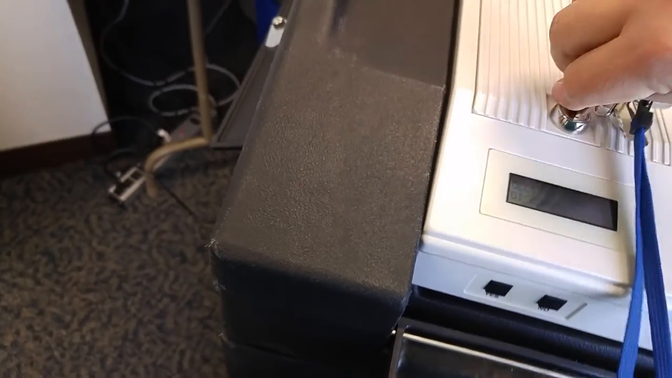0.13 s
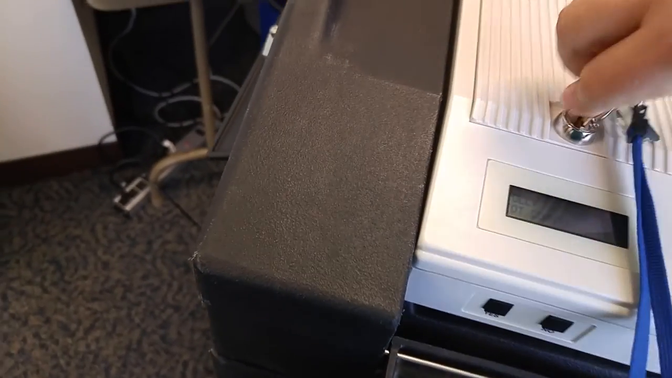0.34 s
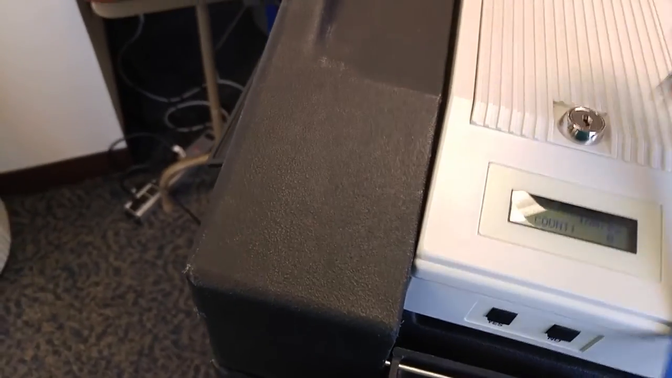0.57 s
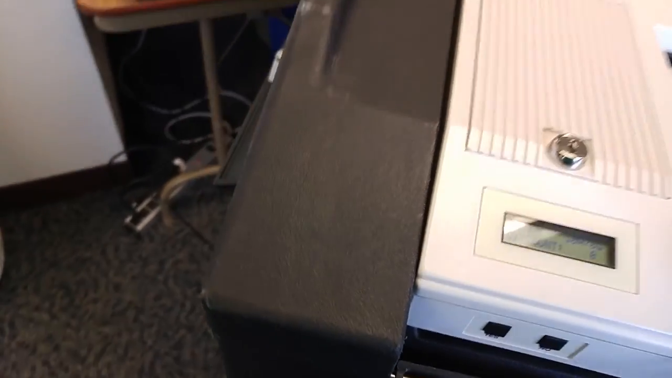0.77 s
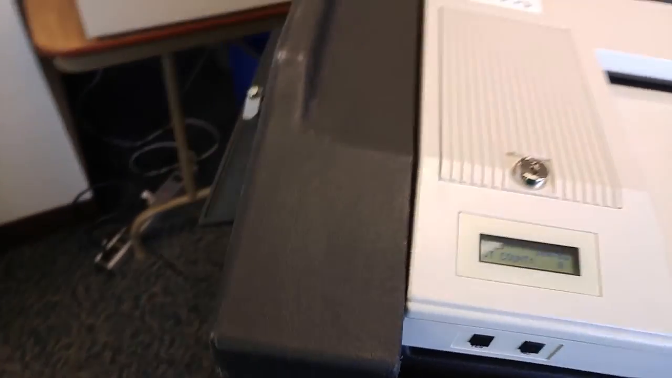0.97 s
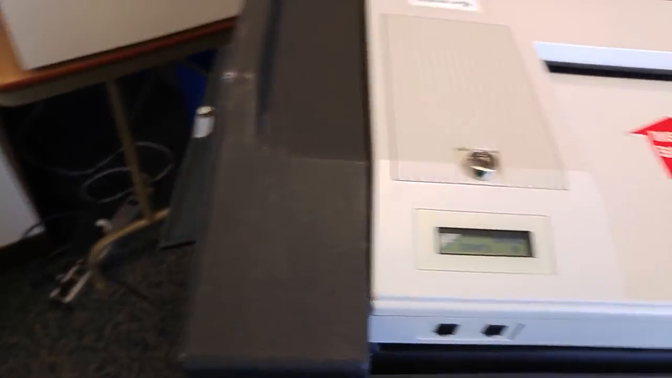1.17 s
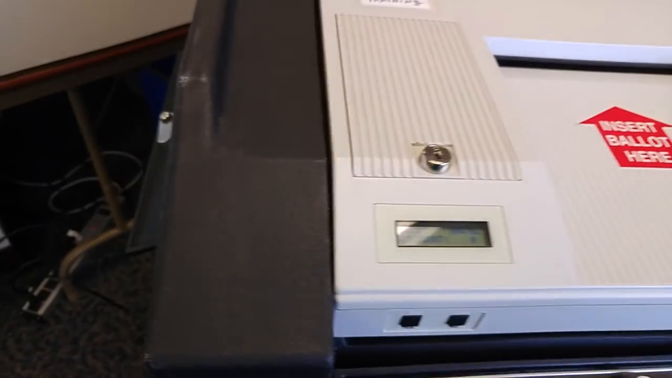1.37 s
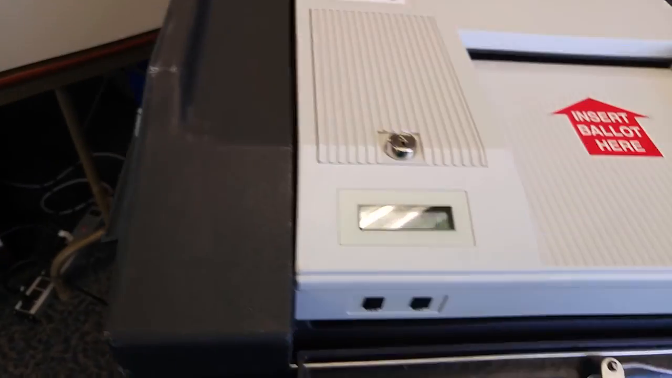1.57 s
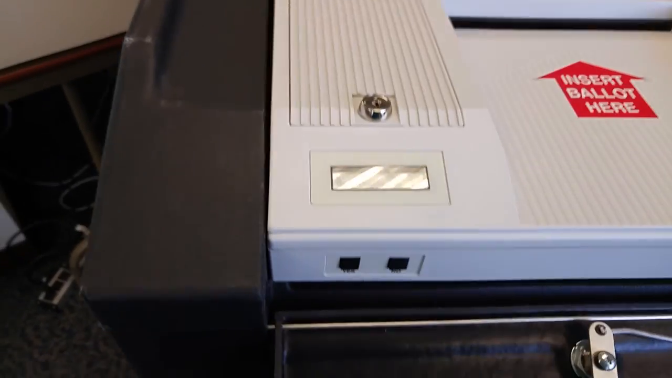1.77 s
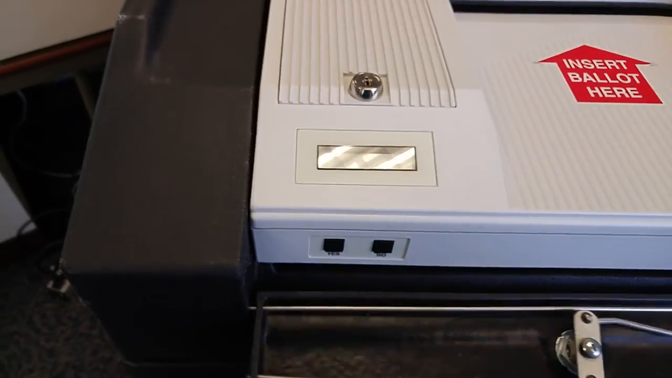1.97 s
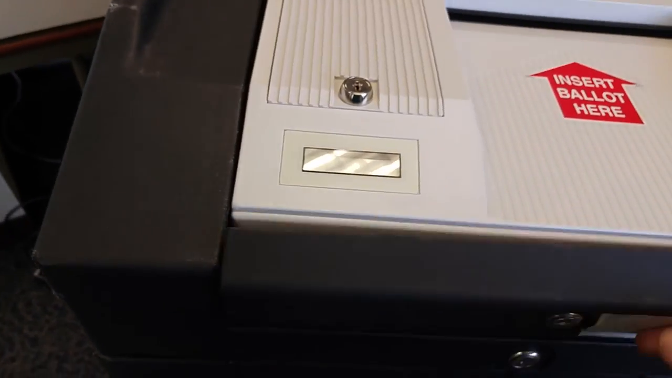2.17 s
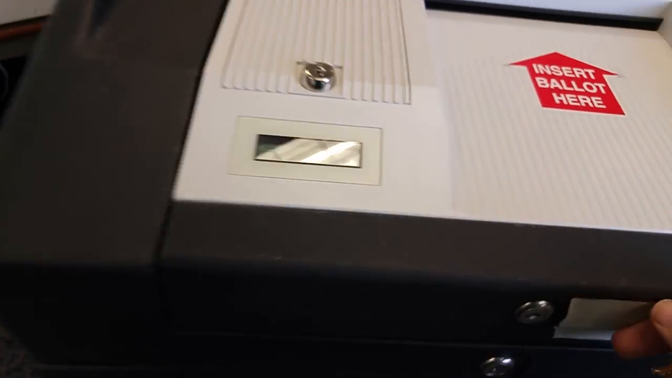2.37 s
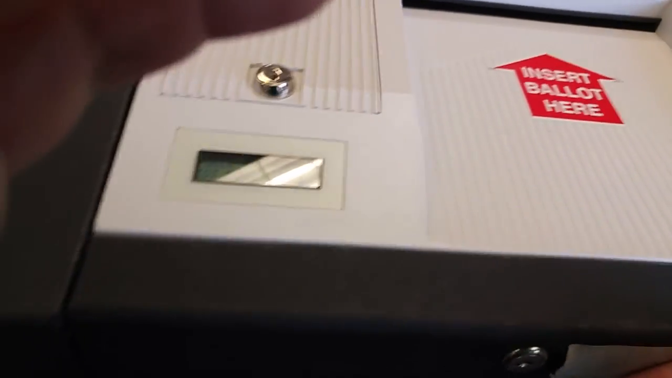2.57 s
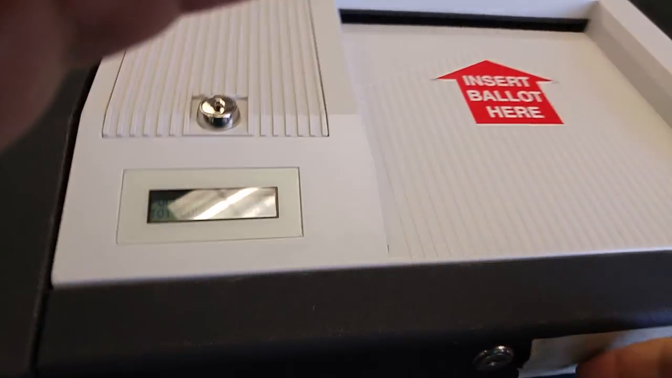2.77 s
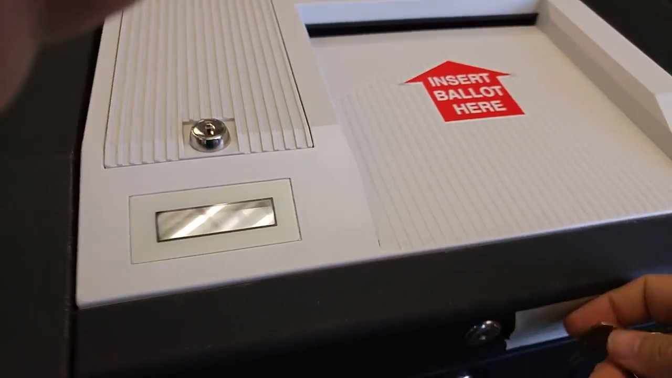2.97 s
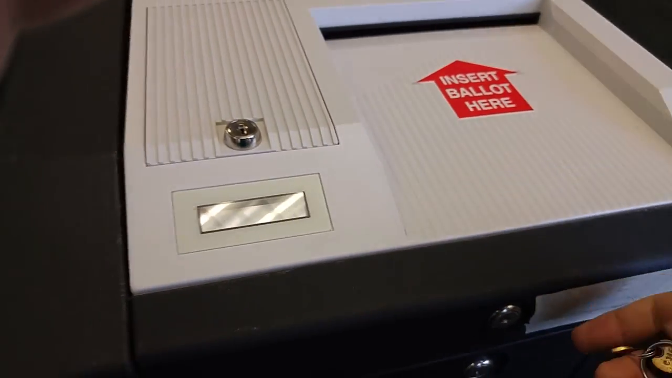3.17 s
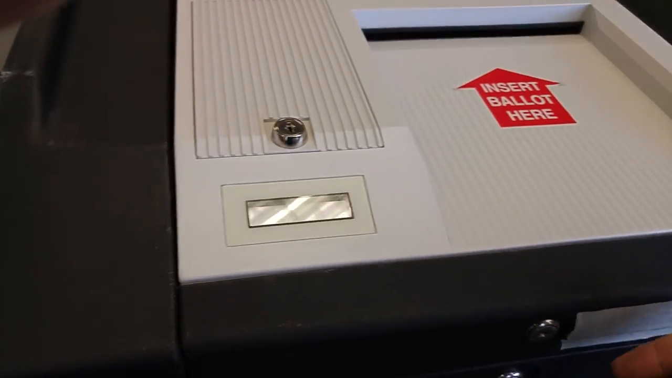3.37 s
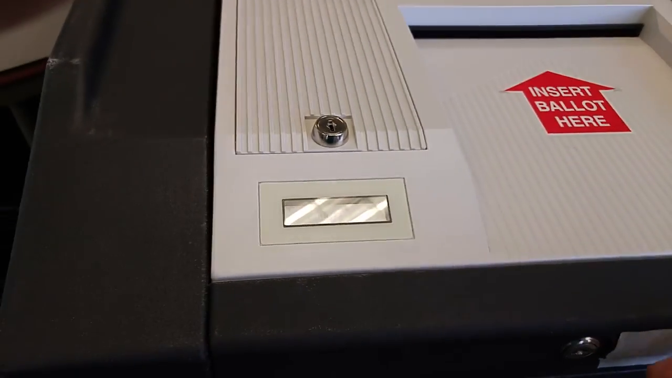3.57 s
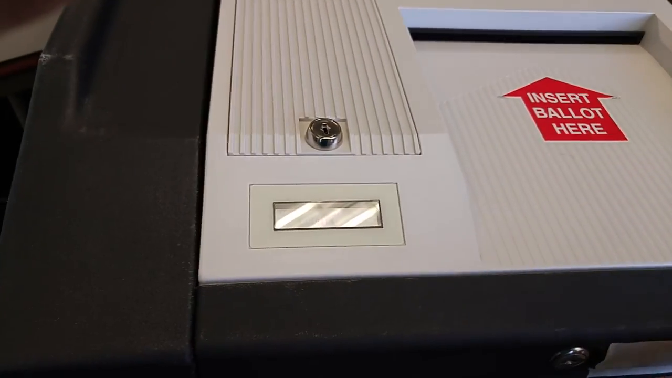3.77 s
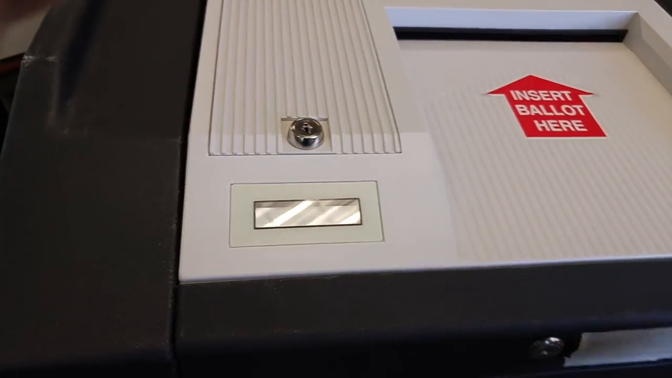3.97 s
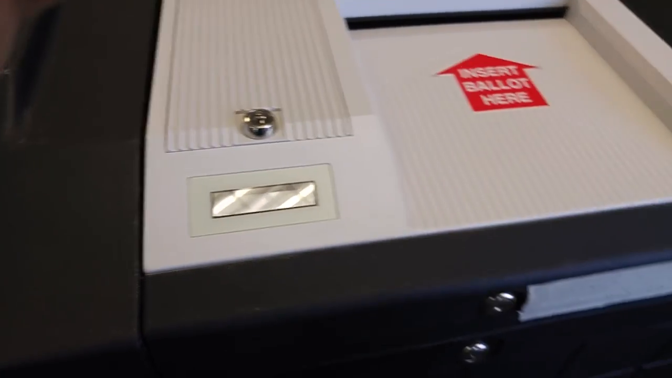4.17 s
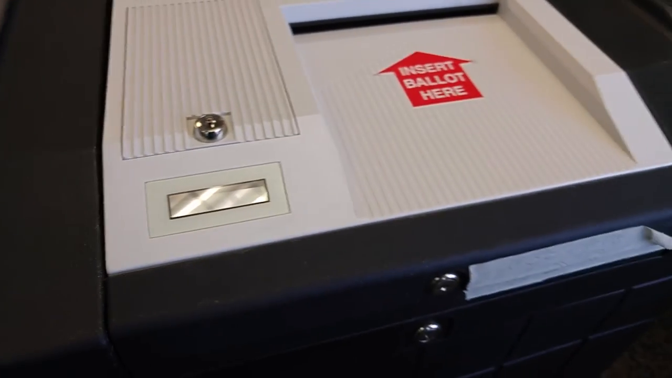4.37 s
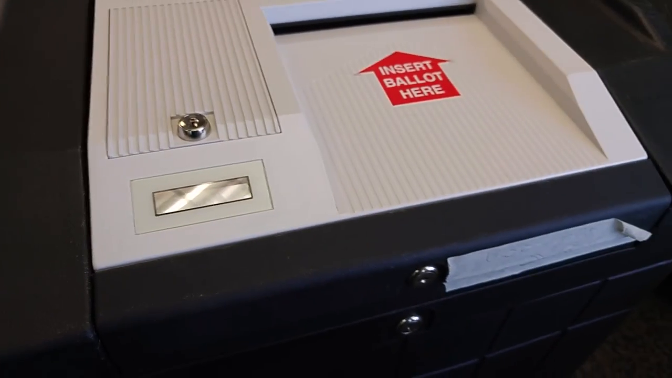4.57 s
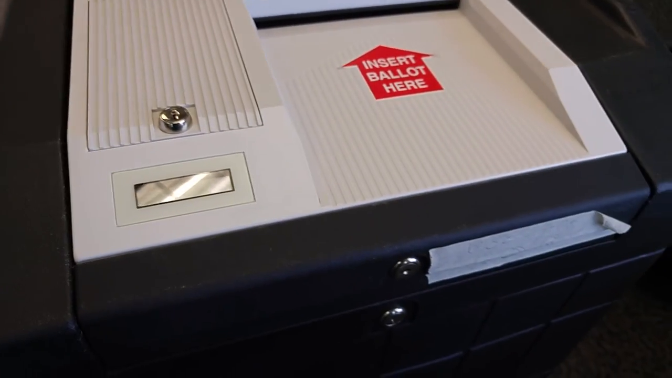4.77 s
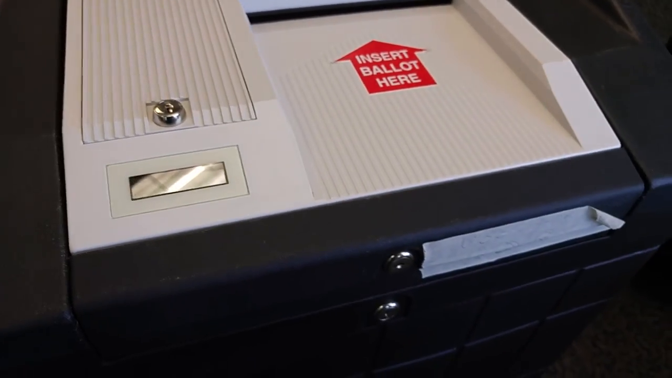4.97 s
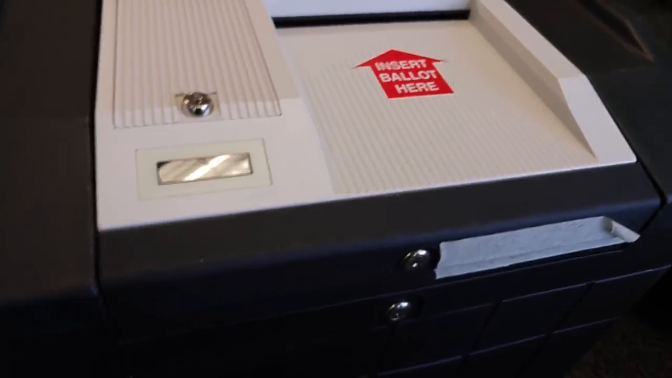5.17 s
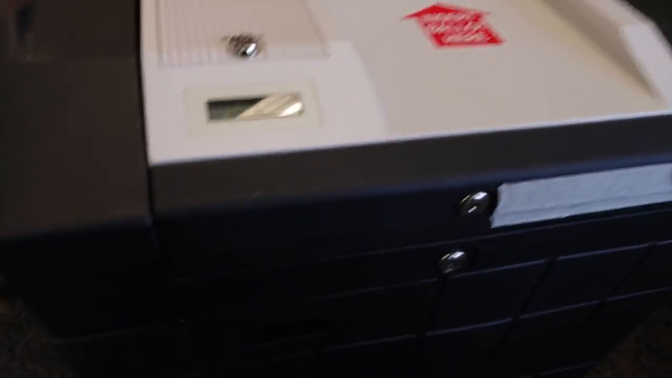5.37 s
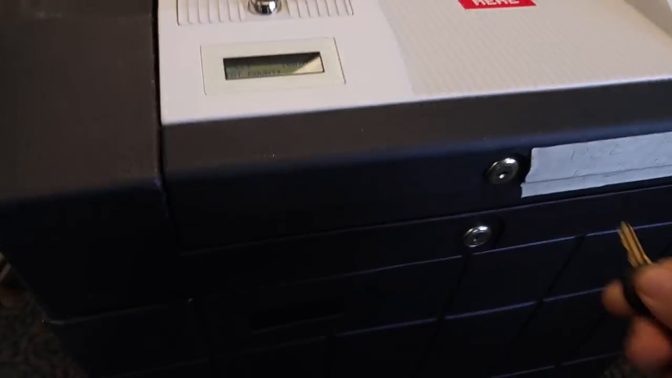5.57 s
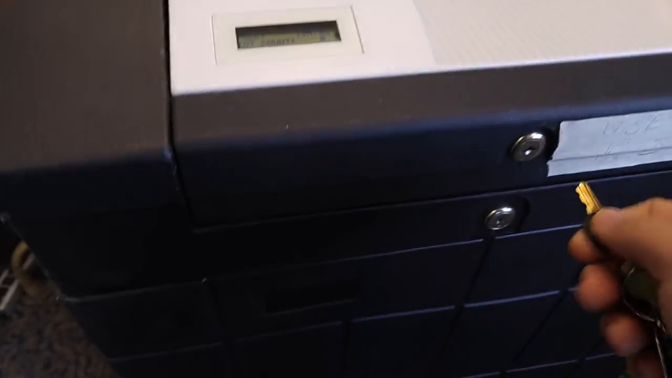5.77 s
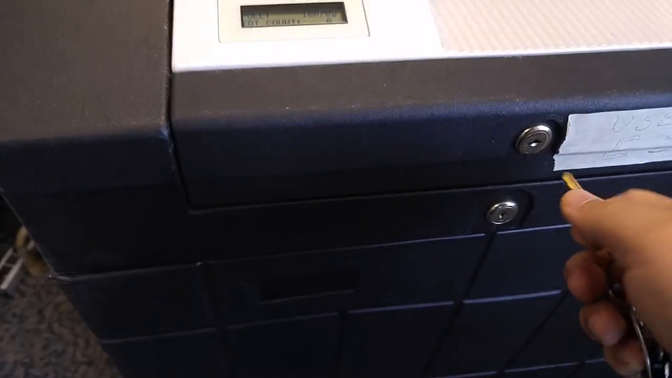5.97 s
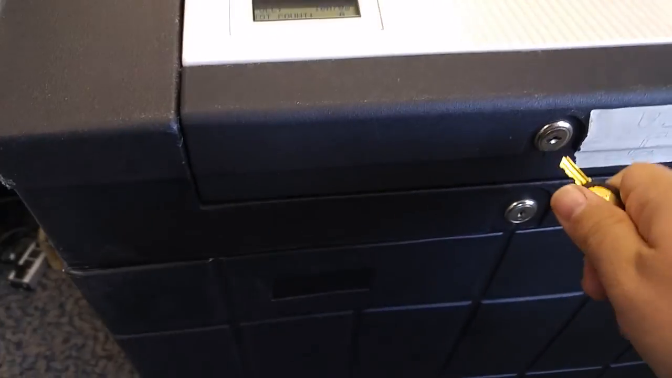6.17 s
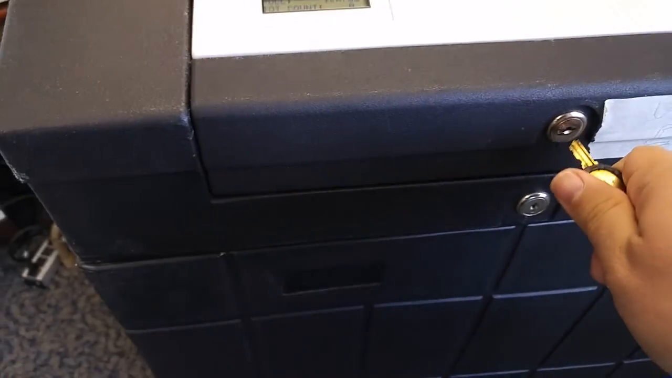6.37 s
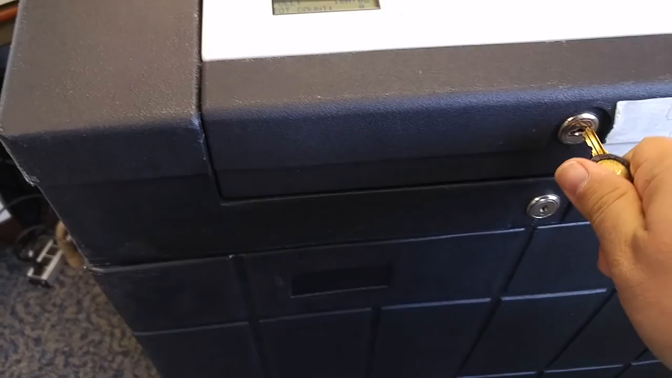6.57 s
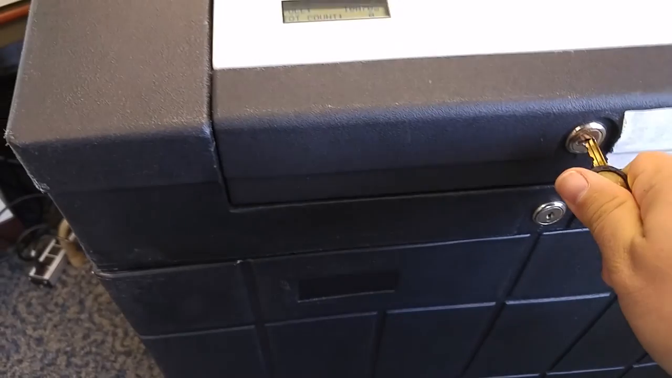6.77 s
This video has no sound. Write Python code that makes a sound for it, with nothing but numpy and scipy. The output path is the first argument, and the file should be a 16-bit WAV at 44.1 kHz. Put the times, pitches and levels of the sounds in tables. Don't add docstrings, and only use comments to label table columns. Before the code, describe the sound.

Close, bright key clicks and jangles in a humming office, with a loud rattling clack at two seconds and faint taps at the end.

```python
import sys
import numpy as np
from scipy import signal
from scipy.fft import rfft, irfft
from scipy.io import wavfile

SR = 44100
rng = np.random.default_rng(int(sys.argv[2]) if len(sys.argv) > 2 else 0)


def attenuation_scalar(level_db):
    decades = np.asarray(level_db, float) / 20
    return 10 ** decades


def transcribe(signal):
    frames = np.atleast_2d(signal).T
    limited = np.clip(frames, -1, 1)
    pcm = np.round(limited * 32767).astype(np.int16)
    wavfile.write(sys.argv[1], SR, pcm)


N = 301203

# [f/Hz, density/dB]
AIR_SPECTRUM = [(28, -37), (42, -12), (65, -8.5), (130, -8), (220, 2.5), (290, -8.5), (360, -1), (470, -17),
                (530, -25.5), (600, -11.5), (690, -8), (1100, -21.5), (2800, -33), (6600, -35), (7900, -29),
                (8600, -23), (9500, -31.5), (11500, -41)]
# [f/Hz, density/dB]
CABINET_SPECTRUM = [(60, -13), (170, -11), (260, 2), (400, -2), (500, -21), (660, 4), (900, -8),
                    (1500, -14), (2600, -27.5)]
# [f/Hz, density/dB]
KEY_SPECTRUM = [(1530, -56), (2600, -25), (3430, -13), (4450, -5), (5390, -7), (7680, 4), (8420, 9),
                (13000, -6.5), (14300, -11), (16300, -2)]
# [f/Hz, density/dB]
RATTLE_SPECTRUM = [(530, -58), (900, 17.5), (2050, 1.5), (3060, 9), (3370, 1), (7780, 7.5), (8570, 4.5),
                   (15300, -6), (16300, -59)]
# [f/Hz, level/dB, t60/s]
LATCH_MODES = [(1200, -40, .035), (2860, -43, .015), (3760, -42, .03), (4920, -34, .018), (5500, -42, .03)]
A, B, C, H, D, E, F, G = 7410, 11400, 11915, 12400, 12950, 13845, 14375, 15640
KEY_MODES_HZ = np.array([1550, 2210, 2600, 2930, 4140, 5860, 6410, 7410, 8165, 8745, 9650, 11400, 11915, 12400, 12950, 13845, 14375, 15640])
# [t/s, f/Hz, level/dB, t60/s]
BUMPS = [
    (.48, 40, -38, .15),
    (2.11, 48, -37, .2),
]
# [t/s, length/s, level/dB]
DRAGS = [
    (0, 0.18, -43),
    (.17, 0.22, -42),
    (2.38, 0.13, -55.5),
    (6.63, 0.15, -60),
]
# [t/s, length/s, level/dB, low f/Hz, high f/Hz]
SWISHES = [(0, 0.29, -50, 885, 3600), (2.342, 0.19, -64, 880, 2520), (3.957, 0.074, -53, 5640, 10200),
           (4.101, 0.086, -47.5, 6600, 10200), (4.143, 0.099, -45, 4600, 9450),
           (4.258, 0.048, -52.5, 600, 2260), (5.561, 0.093, -52, 3000, 11000),
           (5.565, 0.094, -55, 890, 2250), (0.839, 0.035, -54, 3550, 6030), (0.892, 0.033, -41, 3630, 6000),
           (6.622, 0.12, -59, 700, 2040)]
# [t/s, length/s, level/dB]
SLIDES = [(0.518, 0.16, -56), (0.718, 0.078, -37.5), (0.81, 0.075, -48), (1.2, 0.54, -65.5),
          (2.504, 0.6, -64), (3.04, 0.11, -49.5), (3.148, 0.062, -41.5), (3.208, 0.067, -47.5),
          (3.27, 0.12, -60.5), (3.396, 0.04, -51), (3.435, 0.06, -46), (3.501, 0.14, -45),
          (3.694, 0.32, -65), (3.851, 0.035, -54), (4.215, 0.17, -48), (4.372, 0.303, -63.5),
          (4.627, 0.32, -53), (4.85, 0.11, -51), (4.96, 0.19, -49.5), (5.096, 0.077, -49.5),
          (5.165, 0.087, -32.5), (5.27, 0.65, -62.5)]
# [t/s, length/s, level/dB]
LOCK_SLIDES = [
    (0, 0.17, -54),
    (0.145, 0.39, -51.5),
    (2.378, 0.076, -57),
    (6.75, 0.16, -51.5),
]
# [t/s, peak/dB, f/Hz]
LOOP_KNOCKS = [(0.7314, -38.5, 2200), (0.745, -41, 2220), (0.769, -37.5, 2160), (0.8445, -42, 2200),
               (0.8793, -37.5, 2280), (0.9146, -38, 2170), (0.9333, -36, 2440), (0.944, -45, 2280),
               (0.9802, -48, 2120), (4.262, -41, 2040), (4.2722, -41, 2100), (4.2774, -42, 2150),
               (4.2852, -41, 2040), (4.2902, -37, 1770), (5.0394, -42, 2070), (5.0944, -54, 2260),
               (5.1088, -43, 2060), (5.1806, -45, 2120), (5.2036, -46, 2110), (5.3936, -49.5, 1870),
               (5.4094, -47.5, 2080), (5.4331, -55, 2080), (5.4789, -49, 1880), (5.5004, -53.5, 2070),
               (5.5368, -58, 2020)]
# [t/s, thud/dB, latch rattle/dB, contact/s, panel f/Hz]
KNOCKS = [(.006, -44.5, -34.5, 0.0091, 1770), (0.057, -32.5, -41, 0.009, 845),
          (0.104, -38, -33.5, 0.011, 332), (0.189, -33.5, -52, 0.011, 320),
          (0.227, -36.5, -60, 0.0089, 380), (.287, -41, -40, 0.0099, 730), (0.325, -27.5, -53, 0.0048, 640),
          (0.391, -39.5, -29.5, 0.0095, 1275), (.422, -38.5, -40, 0.0034, 1190),
          (1.938, -30.5, -28.5, 0.0076, 800), (1.951, -57, -25.5, 0.0034, 221),
          (1.997, -29, -35, 0.0027, 830), (2.006, -31, -24.5, 0.0012, 327), (2.02, -35, -43, 0.0038, 970),
          (2.04, -59, -31, 0.0045, 1000), (2.05, -27.5, -15, 0.0073, 260), (2.067, -27, -40.5, 0.0035, 840),
          (2.108, -18.5, -13.5, 0.0066, 695), (2.114, -16, -10.5, 0.0088, 646),
          (2.142, -27, -42, 0.006, 313), (2.153, -35, -27.5, 0.0073, 700), (6.409, -48, -55, 0.0077, 923),
          (6.621, -42, -38.5, 0.003, 682), (6.652, -41, -64, 0.0023, 248), (6.701, -47.5, -55, .008, 960),
          (6.779, -47, -42, 0.0059, 1505)]
# [t/s, length/s, nearest mode f/Hz, start level/dB]
LOW_RINGS = [(.562, .014, 8170, -33), (.562, 0.018, 5860, -44.5), (3.632, 0.022, 8745, -32),
             (3.725, 0.011, 8165, -34), (4.328, 0.008, 8165, -27), (5.038, 0.011, 7410, -25.5),
             (.604, 0.0032, 2930, -27.5), (.724, 0.016, 8160, -22), (1.862, 0.0068, 2600, -37.5),
             (2.152, 0.042, 9800, -37), (3.095, 0.0083, 6400, -33), (3.172, 0.026, 2930, -56),
             (.9, .015, 4140, -36.5), (.845, .02, 4140, -58), (3.075, 0.0063, 7410, -26.5),
             (3.652, 0.019, 2930, -53.5), (4.858, 0.023, 8745, -28), (3.564, 0.0059, 5850, -30.5),
             (3.652, 0.023, 8230, -22), (3.702, 0.0063, 8165, -30), (3.896, 0.0084, 8165, -16.5),
             (4.079, 0.0071, 8165, -18), (4.306, 0.024, 8165, -23), (4.468, 0.0093, 8165, -33),
             (4.853, 0.011, 4170, -37.5), (4.88, 0.044, 6410, -44), (4.899, .016, 8165, -27),
             (4.66, 0.011, 8165, -36), (4.754, 0.011, 8165, -37), (4.262, .012, 7410, -31),
             (4.919, 0.047, 8140, -30), (5.021, 0.0032, 2210, -34.5), (5.092, 0.014, 5900, -35),
             (5.094, 0.018, 8060, -29.5), (5.135, 0.023, 8240, -14), (5.137, 0.025, 5860, -20),
             (5.22, 0.015, 5900, -28.5), (6.408, 0.0086, 1550, -35), (6.621, 0.0085, 1550, -30.5)]
# [t/s, length/s, nearest mode f/Hz, start level/dB]
HIGH_RINGS = [(.4, 0.047, E, -42), (.55, .04, E, -52), (.575, 0.045, C, -42), (.63, 0.049, C, -47),
              (.635, 0.048, E, -50), (.705, .02, G, -30), (.724, .02, F, -31), (.724, .03, E, -40),
              (.793, .04, E, -48), (.93, 0.0073, F, -32), (1.24, .08, B, -60), (1.31, .012, D, -50),
              (1.44, .09, B, -62), (1.945, .043, A, -49), (1.94, 0.035, G, -43), (2.145, .03, G, -40),
              (3.18, .012, C, -44), (3.565, .02, B, -48), (3.567, .015, F, -33), (3.59, 0.04, B, -52),
              (3.59, 0.011, F, -28), (3.655, .045, E, -51), (3.655, 0.039, F, -49), (3.3, 0.0084, C, -47),
              (4.308, .025, F, -36), (4.66, .015, F, -44), (4.665, 0.0078, C, -42), (4.855, 0.011, B, -25),
              (4.898, .042, E, -41), (4.9, .05, F, -41), (4.925, .01, C, -34), (5.497, .004, B, -53),
              (4.854, .008, H, -26), (5.351, .005, H, -39), (4.834, .01, F, -36), (4.08, .008, F, -38),
              (5.689, 0.0049, C, -49.5), (5.055, 0.016, D, -46), (5.084, .018, F, -39),
              (5.085, .012, C, -31), (5.136, .02, F, -29), (5.14, .03, G, -34), (5.14, .07, E, -35),
              (5.143, 0.073, C, -26.5), (5.175, .035, F, -35)]
# [t/s, peak/dB, dull part/dB, contact/ms]
PULL_CLICKS = [(.0012, -13, -44, 3.7), (.083, -13.5, -10, 1.6), (.1887, -14.5, -36, 4.2),
               (.1966, -8, -35, 2.4), (.2134, -17, -29, 7.8), (.225, -18, -38, 7.5), (.254, -20, -25, 4.1),
               (.2888, -12.5, -43, 2.4), (.31, -15, -13, 1.3), (.325, -6.5, -49, 3.3),
               (.3895, -10.5, -41, 5.1), (.452, -23, -8, 1.1), (.55, -21.5, -33, 4), (.584, -21, -36, 8.6),
               (.6055, -10.5, -9, 2.05), (.6872, -26.5, -48, 6.2), (.801, -16, -21, 4),
               (.8537, -15, -23, 1.7), (.8791, 1.5, -29, 0.87), (.9019, 4, -22.5, 0.63),
               (.9802, -29, 3, 1.8), (1.0745, -30.5, -14, 1.2), (1.3985, -25, -10.5, 0.8),
               (1.6013, -39.5, 7, 1.1)]
# [t/s, peak/dB, dull part/dB, contact/ms]
LATCH_CLICKS = [
    (1.862, -51.5, 14.5, 2.7),
    (1.9422, -21, 3, 3.2),
    (2.0066, 3.5, -18, 0.58),
    (2.1152, 3.5, -14, 3.6),
    (2.1415, -6, -6.5, 4.3),
    (2.414, -41, 8, 1.5),
    (6.402, -40, 4, 2.2),
    (6.41, -25, -0.5, 2.2),
    (6.818, -27.5, -0.5, 2),
]
# [t/s, peak/dB, dull part/dB, contact/ms]
SORT_CLICKS = [(2.734, -22.5, -18, 1.6), (2.8196, -22.5, -17.5, 2), (3.0342, -30, -25, 2.1),
               (3.0756, -16.5, -16, 1.7), (3.0914, -9, -24, 0.78), (3.1433, -16.5, -9, 0.51),
               (3.156, -19, -11, 1.9), (3.173, -24, -25, 4.5), (3.4063, -26, -17, 1),
               (3.4608, -14.5, -24, 1.2), (3.473, -18.5, -24, 1.3), (3.51, -8, -16.5, 1.7),
               (3.5529, -8, -29, 2.1), (3.5664, -10, -42, 2.7), (3.587, -12.5, -32, 11.6),
               (3.6318, -23, -24, 1.4), (3.7392, -13.5, -21, 1.35), (3.7707, -12.5, -35, 1.2),
               (3.8347, -24, -22, 1.1), (3.891, -16, -21, 1.4), (3.9184, -18, -25, 3.9)]
# [t/s, peak/dB, dull part/dB, contact/ms]
PICK_CLICKS = [(4.08, -10.5, -44, 1.5), (4.131, -8, -19, 0.32), (4.219, -28, -24, 1),
               (4.2502, -20.5, -11, 1.3), (4.2623, -16, -15, 1.1), (4.3077, -25, -31, 8.2),
               (4.3444, -14, -56, 0.76), (4.403, -27, -9, 0.49), (4.5122, -18.5, -23, 2.8),
               (4.6523, -22, -11, 1.2), (4.6904, 7.5, -20, 0.42), (4.8538, -15.5, -21.5, 4.7),
               (4.899, -20, -33, 4.1), (5.0212, -9.5, -14, 1.3), (5.0375, -8, -31, 1.23),
               (5.1112, -1.5, -42, 1), (5.1367, -9, -26, 13), (5.1893, -9, -27, 2.1),
               (5.2913, -26, -27, 1.9), (5.3517, -31, -24, 3.7), (5.397, -23.5, -13, 1.1),
               (6.6241, -12, -13.5, 4.3)]
# [t/s, peak/dB, dull part/dB, rebound delay/s]
DOUBLES = [
    (.769, -1, -21, 0.0094),
    (3.005, -19.5, -19, 0.011),
    (3.5386, 3.5, -24, 0.0049),
    (3.602, -2.5, -25.5, 0.0056),
    (3.874, -13.5, -21, 0.0049),
    (4.285, -6, -17.5, 0.0042),
    (4.438, -28.5, -3.5, 0.0039),
    (4.6305, -20.5, -20, 0.0041),
]
# [t/s, peak/dB, dull part/dB, first gap/s, gap ratio]
CHATTERS = [
    (0.916, -10, -37, .0184, .83),
    (5.2, -10.5, -26, 0.014, 1.03),
]
# [t/s, peak/dB, top region/dB, contact/ms]
EARLY_TICKS = [(0.5354, -32, -16, 1.6), (0.6305, -28, -3, 2.6), (0.7048, -21, -9, 1.7),
               (0.8214, -34, -17, 2.0), (0.844, -17, -14, 4), (0.862, -14, -16, 2.3),
               (1.2625, -32, -15, 2.0), (1.3134, -40, 0, 2.0), (1.5189, -32.5, -7.5, 4.5),
               (2.879, -36, -7, 2.2), (3.2196, -28, -14, 2.0), (3.246, -24, -8, 2.2),
               (3.2984, -27.5, -22, 2.4), (3.3298, -36, -12, 2.0), (3.3453, -30, -18, 2.2),
               (3.3554, -28, -19, 1.5), (3.3644, -33, -16, 2.0), (3.3812, -32, -18, 2.0),
               (3.4125, -25.5, -10, 2.6), (3.4421, -22, -11, 1.8), (3.701, -31, -4, 1.4),
               (3.7265, -30, -24, 1.8), (3.8094, -38, -14, 2.0), (3.8194, -38, -17, 1.7),
               (3.8596, -21, -24, 2.8), (3.9519, -33, -17, 2.2)]
# [t/s, peak/dB, top region/dB, contact/ms]
LATE_TICKS = [(4.0884, -26, -23, 1.36), (4.1484, -23, -14, 2.2), (4.24, -18, -17, 2.0),
              (4.271, -21, -23, 2.0), (4.315, -17, -19.5, 1.9), (4.3314, -20, -17, 1.8),
              (4.3744, -39, -10, 2.0), (4.43, -25.5, -14, 1.8), (4.572, -37, -14, 2.0),
              (4.7536, -34, -12, 2.0), (4.796, -27.5, -15, 2.1), (4.8332, -21, -15, 2.7),
              (4.8824, -17, -14, 2.4), (4.9866, -34, -8, 2.0), (5.007, -26, -14, 1.8),
              (5.0863, -19, -9, 2.0), (5.1564, -20, -4, 2.0), (5.1753, -11, 0, 2.5), (5.3024, -32, -7, 2.0),
              (5.4077, -34, -14, 2.0), (5.4266, -35, -10, 2.0), (5.662, -32.5, -11.5, 2.6),
              (5.688, -40, -7, 1.8)]
# [t/s, peak/dB, top region/dB, contact/ms]
LEAD_TICKS = [
    (.8925, -24, -14, 2.2),
    (.926, -21, -10, 3.2),
]

AIR_DB = -48
ROOM_T60_S, ROOM_DB, ROOM_CUT_HZ = 0.28, -18, 4800
PORT_HZ, PORT_WIDTH_HZ = 8466, 480
NOTCH_HZ, NOTCH_Q, NOTCH_SHARE = 7830, 29, 0.84
CUTOFF_HZ, STEP_HZ, STEP_DB = 17100, 15900, -18
SLIDE_LOW_HZ, THINNER_HZ_PER_DB = 4600, 64
LOCK_LOW_HZ = 2800
LOOP_T60_S, LOOP_THUMP_DB = .021, -5
PANEL_DB, PANEL_T60_S = -31, 0.085
LOW_FADE_DB, HIGH_FADE_DB = 9, 6
TWIN_SHARE, TWIN_LOSS_DB_PER_S = .6, 500
PULL_BRIGHT_DB, LATCH_BRIGHT_DB, SORT_BRIGHT_DB, PICK_BRIGHT_DB = -15.5, -21, -14.5, -11
SOFT_BRIGHTER = 0.11
BLUNT_DARKER = 0.033
DOUBLE_MS, DOUBLE_BRIGHT_DB, REBOUND_LOSS_DB = 0.56, -13, 0.5
CHATTER_MS, CHATTER_BRIGHT_DB = 2.2, -17
TICK_GAIN_DB, TICK_DULL_DB = 0.5, -21


def rms_one(x):
    return x / np.sqrt(np.mean(x ** 2) + 1e-20)


def spectrum_db(hz, points):
    table_hz, table_db = np.transpose(points)
    return np.interp(np.log(hz), np.log(table_hz), table_db)


def colour(x, points):
    hz = np.maximum(np.fft.rfftfreq(len(x), 1 / SR), 1)
    return rms_one(irfft(rfft(x) * attenuation_scalar(spectrum_db(hz, points)), len(x)))


def band(x, low_hz, high_hz):
    edges_hz = [low_hz, min(high_hz, .45 * SR)]
    return signal.sosfilt(signal.butter(2, edges_hz, "band", fs=SR, output="sos"), x)


def ring(x, hz, t60_s):
    r, w = attenuation_scalar(-60 / (t60_s * SR)), 2 * np.pi * hz / SR
    return signal.lfilter([0, np.sin(w)], [1, -2 * r * np.cos(w), r * r], x + 1e-18)


def add(out, s, piece):
    i = max(round(s * SR), 0)
    out[i:i + len(piece)] += piece[:N - i]


def span(row):
    return slice(round(row[0] * SR), round((row[0] + row[1]) * SR))


def grains(per_s, spread_db):
    sizes = attenuation_scalar(spread_db * np.minimum(rng.exponential(1, N), 4)) * rng.choice([-1, 1], N)
    return sizes * (rng.random(N) < per_s / SR)


def uneven(depth_db, low_hz):
    return attenuation_scalar(depth_db * rms_one(band(rng.standard_normal(N), low_hz, 4 * low_hz)))


def strokes(rows, fade):
    gain = np.zeros(N)
    for row in rows:
        t = np.linspace(0, 1, round(row[1] * SR))
        add(gain, row[0], attenuation_scalar(row[2]) * np.clip(np.minimum(2 * t, 1 - t) / fade, 0, 1))
    return gain


def air():
    return attenuation_scalar(AIR_DB) * colour(rng.standard_normal(N), AIR_SPECTRUM)


def room(x):
    t = np.arange(round(.5 * SR)) / SR
    decay = attenuation_scalar(-60 * t / ROOM_T60_S) * (t > .004)
    tail = band(rng.standard_normal(len(t)), 83, ROOM_CUT_HZ) * decay
    through_port = band(rng.standard_normal(len(t)), PORT_HZ - 900, PORT_HZ + 1600) * decay
    tail = tail + 0.47 * through_port
    return attenuation_scalar(ROOM_DB) * signal.fftconvolve(x, tail / np.sqrt(np.sum(tail ** 2)))[:N]


def bumps():
    out, t = np.zeros(N), np.arange(SR // 4) / SR
    for s, hz, db, t60_s in BUMPS:
        decay = attenuation_scalar(db - 60 * t / t60_s)
        add(out, s, decay * np.sin(2 * np.pi * hz * t) * np.minimum(t / .015, 1))
    return out


def drags():
    friction = grains(330, spread_db=5.0) + 1.4 * rng.standard_normal(N)
    return strokes(DRAGS, fade=0.16) * colour(friction, CABINET_SPECTRUM) * uneven(3.4, 31)


def swishes():
    out = np.zeros(N)
    fibres = grains(14000, spread_db=2.5) * uneven(1.8, 12.0)
    fibres = fibres + 1.5 * band(fibres, PORT_HZ - PORT_WIDTH_HZ, PORT_HZ + PORT_WIDTH_HZ)
    for row in SWISHES:
        part, low_hz, high_hz = span(row), row[3], row[4]
        brushed = band(band(fibres[part], low_hz, high_hz), low_hz, high_hz)
        out[part] += rms_one(brushed) * strokes([row], fade=0.19)[part]
    return out


def rustle():
    fine = colour(grains(3500, spread_db=4.5) * uneven(3.0, 10.3), KEY_SPECTRUM)
    hiss = colour(rng.standard_normal(N), KEY_SPECTRUM) * uneven(4.0, 14.0)
    modes_hz = KEY_MODES_HZ[5:]
    chatter = 0
    for hz, db in zip(modes_hz, spectrum_db(modes_hz, KEY_SPECTRUM)):
        chatter = chatter + attenuation_scalar(0.57 * db) * ring(grains(220, spread_db=3.0), hz, 0.035)
    sliding = 1.2 * fine + 0.25 * hiss + 0.9 * rms_one(chatter)
    rows = [(*row, SLIDE_LOW_HZ - THINNER_HZ_PER_DB * (row[2] + 45)) for row in SLIDES]
    rows += [(*row, LOCK_LOW_HZ) for row in LOCK_SLIDES]
    out = np.zeros(N)
    for row in rows:
        part = span(row)
        out[part] += band(sliding[part], 0.14 * row[3], 27000)
    return out * strokes(rows, fade=0.25)


def wire_loop():
    out, t = np.zeros(N), np.arange(2000) / SR
    for s, db, hz in LOOP_KNOCKS:
        shape = attenuation_scalar(-60 * t / LOOP_T60_S) * np.minimum(t / 0.0013, 1)
        roughness = 1 + 3.8 * band(rng.standard_normal(len(t)), 60, 410)
        ping = np.sin(2 * np.pi * hz * t) * shape * roughness
        thump = np.sin(2 * np.pi * 900 * t) * attenuation_scalar(LOOP_THUMP_DB - 13000 * t)
        add(out, s, attenuation_scalar(db + 4.5) * (ping + thump))
    return out


def knocks():
    t, out = np.arange(round(.4 * SR)) / SR, np.zeros(N)
    for s, thud_db, rattle_db, contact_s, panel_hz in KNOCKS:
        body_noise, latch_noise = rng.standard_normal((2, len(t)))
        rise = np.minimum(t / (0.5 * contact_s), 1)
        contact = rise * np.exp(-t / contact_s)
        thud = colour(body_noise, CABINET_SPECTRUM) * (contact + attenuation_scalar(-3.0) * rise * attenuation_scalar(-280 * t))
        thud = thud + attenuation_scalar(PANEL_DB) * ring(3 * body_noise * contact, panel_hz, PANEL_T60_S)
        rattle = colour(latch_noise, RATTLE_SPECTRUM) * contact
        rattle = rattle + colour(latch_noise, KEY_SPECTRUM) * attenuation_scalar(-5.0 - 520 * t) * rise
        for hz, db, t60_s in LATCH_MODES:
            rattle = rattle + attenuation_scalar(db) * ring(3 * latch_noise * contact, hz, t60_s)
        add(out, s, attenuation_scalar(thud_db + 4.0) * band(thud, 88, 5220) + attenuation_scalar(rattle_db) * rattle)
    return out


def rings():
    rows = [(*row, row[3] - LOW_FADE_DB) for row in LOW_RINGS]
    rows += [(*row, row[3] - HIGH_FADE_DB) for row in HIGH_RINGS]
    out = np.zeros(N)
    for s, length_s, near_hz, start_db, end_db in rows:
        phase, beat = rng.random(2)
        hz = KEY_MODES_HZ[np.argmin(abs(KEY_MODES_HZ - near_hz))]
        t = np.arange(round((length_s + .02) * SR)) / SR
        free_db = np.interp(t, [0, length_s], [start_db, end_db])
        shape = attenuation_scalar(free_db - 2800 * np.maximum(t - length_s, 0))
        finger_brush = signal.lfilter([.0025], [1, -1.9, .9025], rng.standard_normal(len(t)))
        wobble = 1 + .25 * np.sin(2 * np.pi * (phase + 120 * beat * t)) + 3.0 * finger_brush
        blade = wobble * np.sin(2 * np.pi * (hz * t + phase))
        twin = TWIN_SHARE * attenuation_scalar(-TWIN_LOSS_DB_PER_S * t) * np.sin(2 * np.pi * hz * (1.015 + .04 * beat) * t)
        attack = np.sin(np.minimum(t / 0.00067, 1) * np.pi / 2) ** 2
        add(out, s + 0.00099, attack * shape * (blade + twin))
    return out


def contacts():
    rows = []
    for table, bright in [(PULL_CLICKS, PULL_BRIGHT_DB), (LATCH_CLICKS, LATCH_BRIGHT_DB),
                          (SORT_CLICKS, SORT_BRIGHT_DB), (PICK_CLICKS, PICK_BRIGHT_DB)]:
        rows += [(s, db, dull, bright, ms) for s, db, dull, ms in table]
    for s, db, dull, gap_s in DOUBLES:
        for k in range(2):
            rows.append((s + k * gap_s, db - k * REBOUND_LOSS_DB, dull, DOUBLE_BRIGHT_DB, DOUBLE_MS))
    for s, db, dull, gap_s, ratio in CHATTERS:
        for k in range(4):
            delay_s = gap_s * np.sum(ratio ** np.arange(k))
            rows.append((s + delay_s, db, dull, CHATTER_BRIGHT_DB, CHATTER_MS))
    for table in (EARLY_TICKS, LEAD_TICKS, LATE_TICKS):
        rows += [(s, db + TICK_GAIN_DB, TICK_DULL_DB, bright, ms) for s, db, bright, ms in table]
    return [(s, db, dull, bright - SOFT_BRIGHTER * (db + 31.0) - BLUNT_DARKER * (dull + 20), ms)
            for s, db, dull, bright, ms in rows]


def clicks():
    out, t = np.zeros(N), np.arange(1600) / SR
    for s, db, dull_db, bright_db, ms in contacts():
        contact = (1 - np.exp(-t / (0.00028 + 0.00015 * ms))) * attenuation_scalar(-11 * t * 1000 / ms)
        regions = [(2100, 5500, dull_db + 0.5),
                   (PORT_HZ - PORT_WIDTH_HZ, PORT_HZ + 2.0 * PORT_WIDTH_HZ, -1.5),
                   (5500, 7800, 0.31 * dull_db - 3.0),
                   (10500, 16000, bright_db + 8.5)]
        for low, high, part_db in regions:
            burst = rng.standard_normal(len(t)) * (contact + 0.079 * attenuation_scalar(-1500 * t))
            scrape = band(burst, low, high) * np.sqrt(SR / 2 / (high - low))
            mode_hz = low + (high - low) * rng.random() ** 1.48
            mode = np.sin(2 * np.pi * mode_hz * t) * contact
            add(out, s, attenuation_scalar(db + part_db) * (0.36 * scrape + 0.37 * mode))
    return out


def scene():
    near = drags() + swishes() + rustle() + wire_loop() + knocks() + clicks()
    return (air() + bumps() + near + room(near) + rings())[None]


def band_limit(x):
    return signal.sosfilt(signal.butter(12, 17140, fs=SR, output="sos"), x)


def record(dry):
    dipped = dry - NOTCH_SHARE * signal.lfilter(*signal.iirpeak(NOTCH_HZ, NOTCH_Q, SR), dry)
    step = np.where(np.fft.rfftfreq(N, 1 / SR) > STEP_HZ, attenuation_scalar(STEP_DB), 1)
    stepped = irfft(rfft(dipped) * step, N)
    rounded = .93 * np.tanh(stepped / .93)
    mix = signal.sosfilt(signal.cheby2(12, 80, CUTOFF_HZ, fs=SR, output="sos"), rounded)
    return band_limit(mix)


dry = scene()
out = record(dry)
transcribe(out)
```